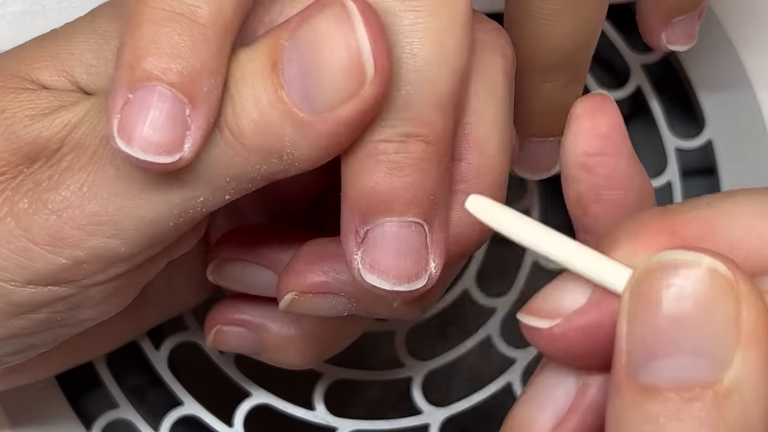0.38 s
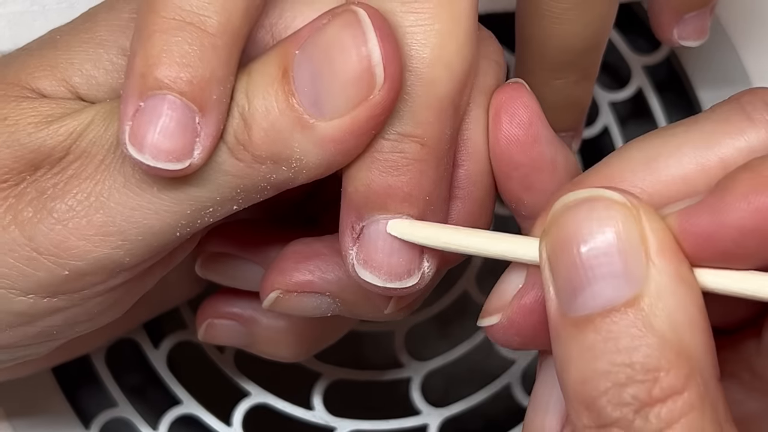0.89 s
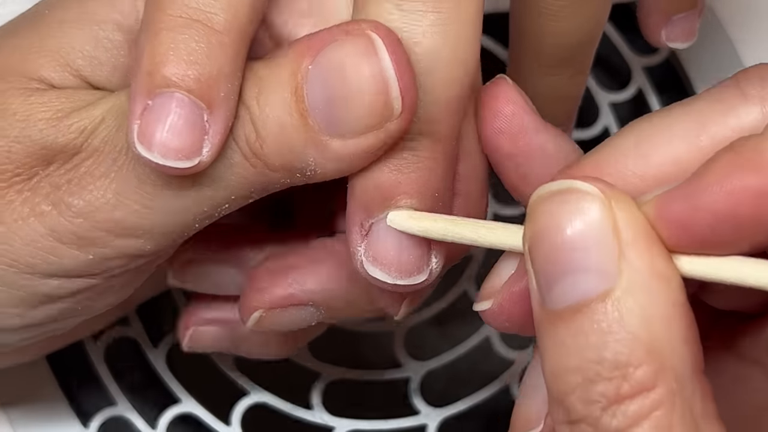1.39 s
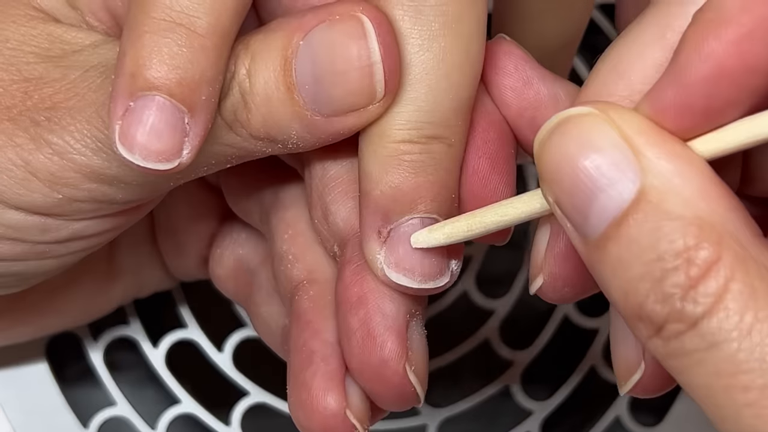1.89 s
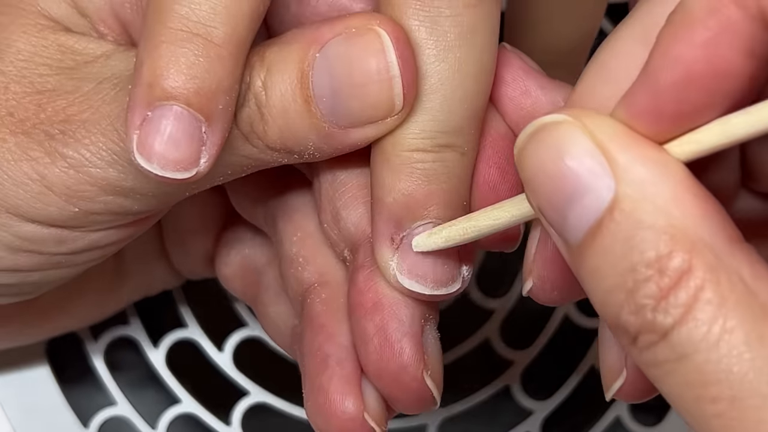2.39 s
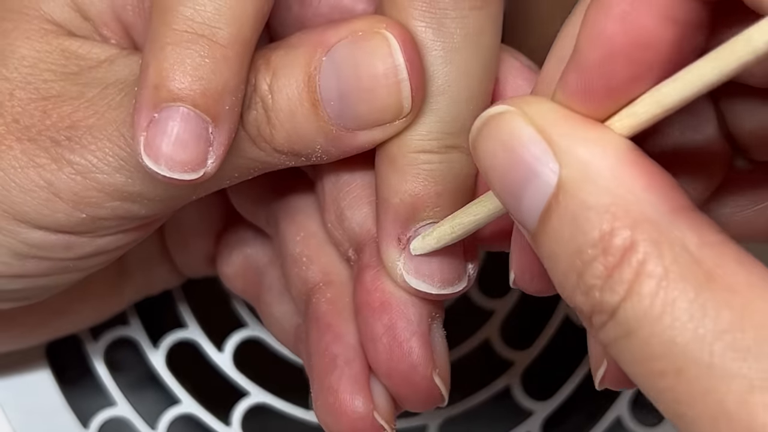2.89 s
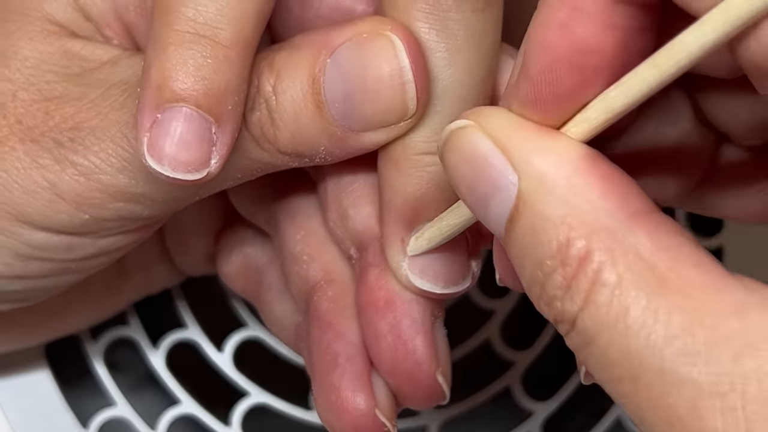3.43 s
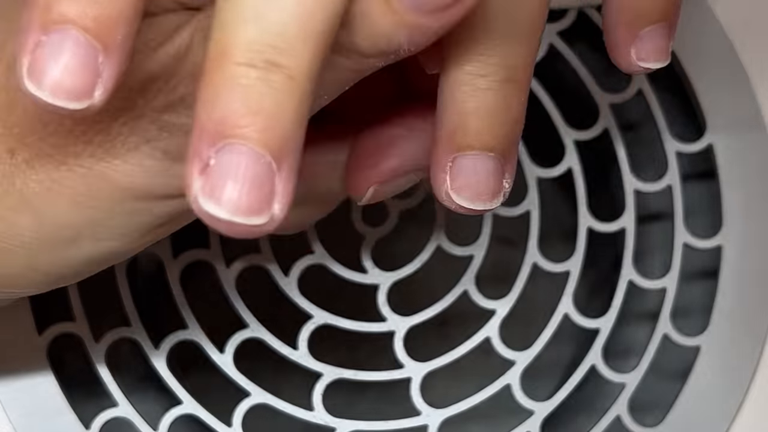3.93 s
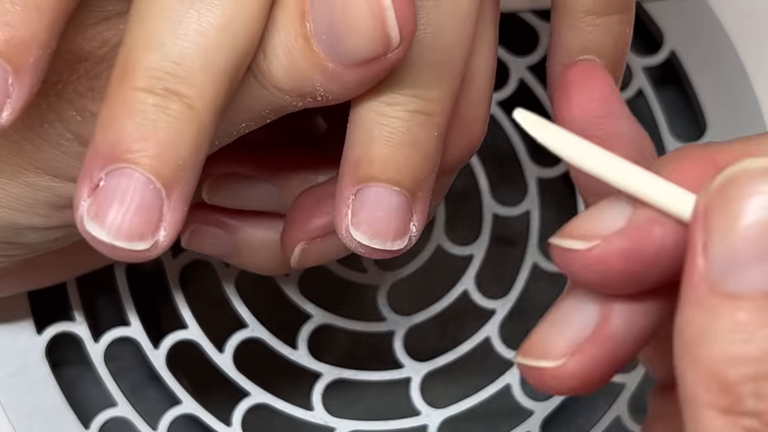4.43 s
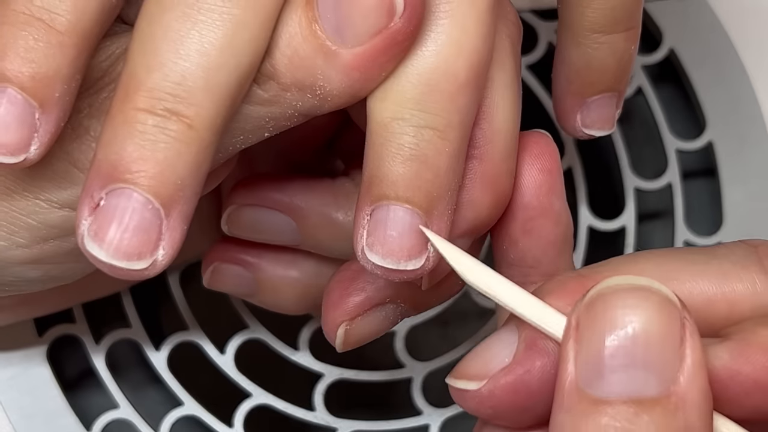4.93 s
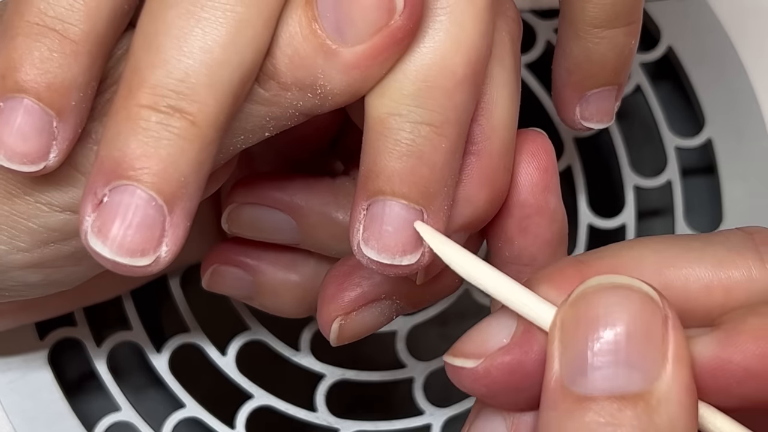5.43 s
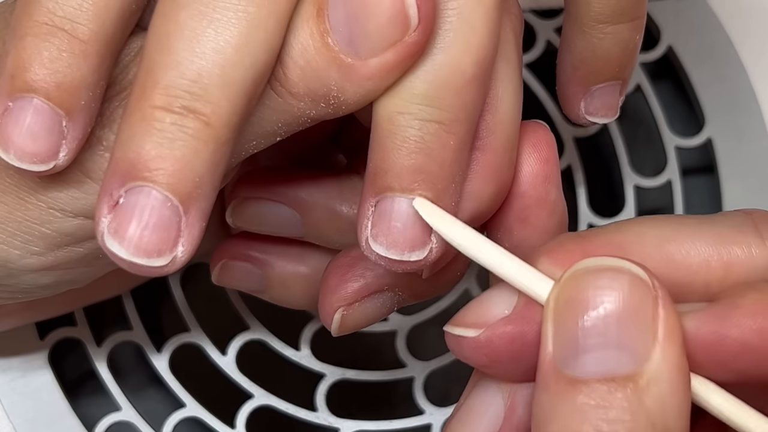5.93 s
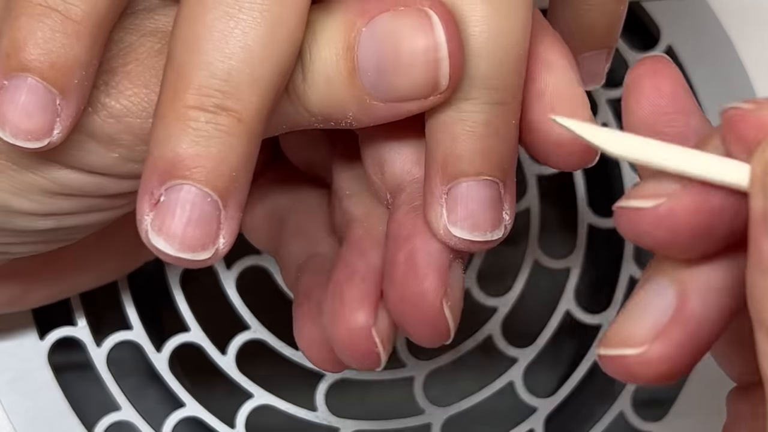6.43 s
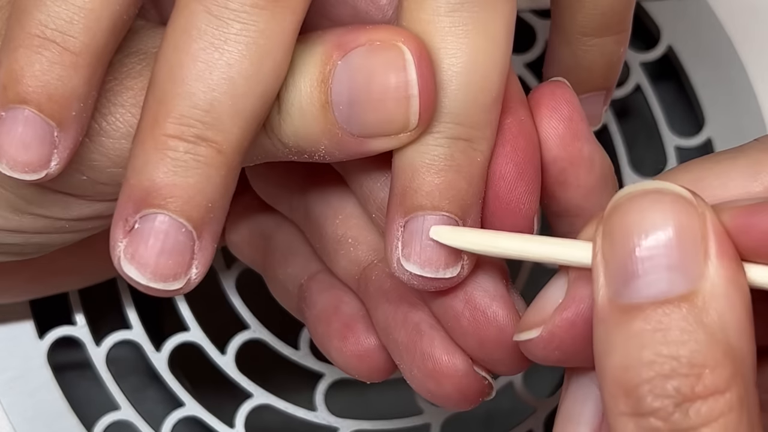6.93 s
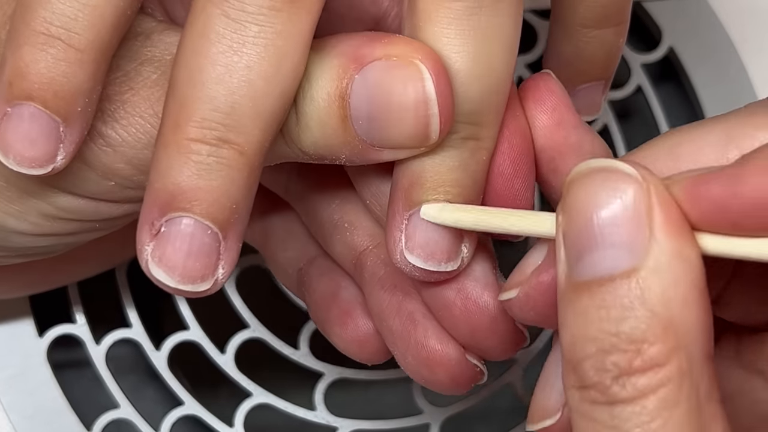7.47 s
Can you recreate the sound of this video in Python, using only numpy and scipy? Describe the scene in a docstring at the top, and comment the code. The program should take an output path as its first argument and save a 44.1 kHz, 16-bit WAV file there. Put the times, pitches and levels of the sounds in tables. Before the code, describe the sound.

From 0 to about 7.6 seconds a small extraction fan under a grille runs without stopping, recorded close by a phone in a quiet room. Its very low hum wavers in pitch and strength, surrounded by a low booming rumble and dark, soft rushing air with slight hollow housing resonances; extremely faint thin tones flicker in the high treble. Handling sounds are tiny and mostly buried. Around 0.3-0.4 a small cluster of dry ticks from a wooden stick and nails; at 1.4-1.7 a tick, soft skin rubs and a brief slide. From 3.45 to 4.2 come the fullest grainy rubs and narrow hisses sinking in pitch as the hands shift, with fading rubs to 4.5. A very short crisp tick falls at 4.8, slight rubs at 5.2-5.8, a faint tick at 6.2, then short dry scrapes and slides at 6.3-6.6. The fan alone continues to the end.

```python
"""A low, wavering hum under rushing air: a small extraction fan below a grille on a table, close to
a phone in a quiet room. Hum, rumble and air are noise shaped by resonances; thin tones flicker on top.
Hands shifting above the grille give faint rubs (grainy noise), slides (narrow sinking noise bands)
and ticks (decaying sines) in the treble."""
import sys
import numpy as np
from scipy import signal
from scipy.fft import rfft, irfft, next_fast_len
from scipy.io import wavfile
from scipy.ndimage import uniform_filter1d

SR = 44100
rng = np.random.default_rng(int(sys.argv[2]) if len(sys.argv) > 2 else 0)


def boost_factor(decibels):
    """Convert a level in decibels to a linear amplitude factor."""
    exponent = np.asarray(decibels, float) / 20
    return 10 ** exponent


def wav_record(signal):
    """Record a signal, one row per channel, as 16-bit PCM in the file named by sys.argv[1]."""
    frames = np.transpose(np.atleast_2d(signal))
    bounded = np.clip(frames, -1, 1)
    # unit amplitude maps onto the largest positive 16-bit level
    quanta = np.round(bounded * 32767).astype(np.int16)
    wavfile.write(sys.argv[1], SR, quanta)


N = 334273
TIME = np.arange(N) / SR
HZ = np.maximum(np.fft.rfftfreq(N, 1 / SR), 1)


def level(x, db):
    """Scale so that the mean of both ports has this rms level."""
    mid = np.mean(x, axis=0)
    return x * boost_factor(db) / np.sqrt(np.mean(mid ** 2))


def over_hz(points, column=1):
    """A table column interpolated over log frequency."""
    table = np.array(points, float)
    return np.interp(np.log(HZ), np.log(table[:, 0]), table[:, column])


def over_time(points):
    """Gain from a (t/s, level/dB) table, interpolated in dB."""
    return boost_factor(np.interp(TIME, *np.transpose(points)))


def lifts(modes):
    """Gain of resonances that rise over a flat floor."""
    power = 1
    for hz, width_hz, db in modes:
        detune = 2 * (HZ - hz) / width_hz
        power = power + (boost_factor(db) ** 2 - 1) / (1 + detune ** 2) ** 2
    return np.sqrt(np.maximum(power, .01))


def walk(rate_hz):
    """Random levels held 1 / rate_hz and slewed twice; spread near 1."""
    hold = int(SR / rate_hz)
    steps = np.repeat(rng.standard_normal(N // hold + 1), hold)
    return 1.3 * uniform_filter1d(uniform_filter1d(steps, hold), hold)[:N]


# stereo pickup at the two ports: f/Hz, own over shared part/dB, left over right/dB, left lead/rad
PORTS = [(60, -43.5, 0, -0.02), (138, -32, 0.5, -0.055), (328, -22.5, 2, -0.19), (560, -4.5, 2, -0.76),
         (950, 4.5, 2, -0.46), (1200, -8.5, 0, -0.86), (1760, -11.5, 1, 0.095), (2940, -2.5, -0.5, -1),
         (3700, -7.5, 0.2, -1.1), (4540, -4, 0, -1.4), (5150, -3.5, -0.2, -2), (5830, -4, 0, -1.1),
         (9150, -5, 0.5, -1.1), (15000, -7, 0, -1.9)]


def ports(gain):
    """Coloured noise at both ports: a shared part plus an independent part each."""
    shared, left, right = rfft(rng.standard_normal((3, N)))
    shared_power = 1 / (1 + boost_factor(over_hz(PORTS, 1)) ** 2)
    own = np.sqrt(1 - shared_power) * np.array([left, right])
    both = np.sqrt(shared_power) * shared + own
    lean = boost_factor(over_hz(PORTS, 2) / 2) * np.exp(.5j * over_hz(PORTS, 3))
    return irfft(gain * both * np.array([lean, 1 / lean]), N)


def narrow(hz, width_hz):
    """Narrow noise band on a moving centre, 1.4 rad apart at the two ports."""
    phase = 2 * np.pi * np.cumsum(hz + 0 * TIME) / SR + np.array([[0], [1.4]])
    return walk(width_hz) * np.sin(phase) + walk(width_hz) * np.cos(phase)


def stroke(start_s, length_s, rise, release_s, fade_db):
    """Envelope: rise over a share of the stroke, fade while contact lasts, release."""
    age = (TIME - start_s) / length_s
    edges = np.clip(np.minimum(age / rise, (1 - age) * length_s / release_s + 1), 0, 1)
    return edges * boost_factor(fade_db * np.clip((age - rise) / (1 - rise), 0, 2))


# thin flickering treble tones: f/Hz, width/Hz, level/dB before the common swell
WHINES = [(9451, 25, -103), (9515, 25, -103), (9665, 25, -104), (9731, 25, -104), (15440, 20, -101),
          (15507, 20, -96), (15619, 20, -97), (15707, 20, -95), (15500, 500, -95)]


def whines():
    """Thin wavering lines: narrow noise bands under one slow common swell."""
    swell = boost_factor(2.7 * walk(5.2))
    return swell * sum(boost_factor(db) * narrow(hz, width_hz) for hz, width_hz, db in WHINES)


# wooden stick and nails: t/s, click level/dB, f/Hz, decay/s
TICKS = [(0.2888, -55, 13700, .0004), (0.347, -66, 12000, .00015), (0.3735, -61, 13600, .0003),
         (0.3945, -59, 3900, .0018), (1.3968, -59, 11000, .00012), (3.5244, -59, 9500, .00015),
         (3.7744, -65, 11000, .00015), (4.2822, -66, 11000, .00015), (4.8057, -51, 9000, .00008),
         (5.9367, -70, 8200, .0002), (6.0494, -70, 12000, .0002), (6.1913, -57, 13000, .0002)]


def ticks():
    """Dry click of a few cycles, duller knock of the wood, short noisy tail."""
    out, t = np.zeros(N), np.arange(400) / SR
    noises = rng.standard_normal((len(TICKS), 400))
    knock = .35 * np.exp(-t / .0004) * np.sin(2 * np.pi * 5600 * t)
    for (start_s, db, hz, decay_s), noise in zip(TICKS, noises):
        click = np.exp(-t / decay_s) * np.sin(2 * np.pi * hz * t)
        tail = .3 * np.exp(-t / .0008) * np.diff(noise, prepend=0)
        i = int(start_s * SR)
        out[i:i + 400] += boost_factor(db) * (click + knock + tail)
    # hands nearer the right port: one-sample lead
    return np.array([np.roll(out, 1), out])


# arm over the rest, narrow hiss bands: t/s, length/s, start f/Hz, level/dB before fade
SLIDES = [(1.41, .11, 5750, -83), (1.55, .07, 5750, -76), (3.655, .58, 5560, -74), (3.7, .12, 7000, -77),
          (3.84, .36, 6900, -73), (6.37, .06, 8050, -76), (6.42, .17, 5350, -75), (6.495, .05, 7750, -77)]
SLIDE_RISE, SLIDE_RELEASE_S, SLIDE_FADE_DB = .2, .05, -6  # rise as a share of the stroke
SLIDE_SAG_PER_S, SLIDE_WANDER, SLIDE_WIDTH = .1, .005, .085  # shares of the start pitch
SLIDE_PATCHY_DB = 1.7  # broken contact


def slides():
    """Narrow, broken bands of noise that sink as the arm slows."""
    out = 0
    for start_s, length_s, hz, db in SLIDES:
        sag = SLIDE_SAG_PER_S * np.clip(TIME - start_s, 0, length_s)
        sinking_hz = hz * (1 - sag + SLIDE_WANDER * walk(17))
        gate = stroke(start_s, length_s, SLIDE_RISE, SLIDE_RELEASE_S, SLIDE_FADE_DB)
        contact = boost_factor(db + SLIDE_PATCHY_DB * walk(40))
        out = out + gate * contact * narrow(sinking_hz, SLIDE_WIDTH * hz)
    return out


# skin on skin, a row a stroke: t/s, length/s, then soft rub, dry scrape, fine crackle level/dB before fade
RUBS = [(0.082, .05, -90, -92, -91.5), (0.318, 0.082, -82, -83, -87.5), (1.384, .13, -76, -82, -83),
        (1.502, .22, -82, -97, -97.5), (3.444, .04, -86, -82, -89.5), (3.513, .16, -68.5, -72, -80),
        (3.663, .12, -73, -80, -82), (3.758, .42, -71.5, -84, -79.5), (3.9, 0.13, -79, -84, -81),
        (4.128, .14, -83, -89, -89), (4.28, .27, -84, -89, -86), (5.238, 0.036, -80, -91, -93.5),
        (5.42, 0.034, -81, -90, -92.5), (5.537, .05, -70, -89, -90), (5.569, .2, -74, -96, -91),
        (6.304, .02, -79, -73, -80.5), (6.31, .3, -73, -85, -88), (6.361, .065, -83, -87, -72.5),
        (6.492, .045, -75, -76.5, -70.5), ]
# spectra of rub, scrape, crackle: f/Hz, relative density/dB
RUB_COLOURS = [
    [(900, -8), (1400, -2), (2500, -6), (4300, 0), (6000, -5), (8000, -25), (16000, -50)],
    [(4000, -30), (6500, -8), (8500, 0), (11000, -6), (13000, -25), (16000, -40)],
    [(9000, -35), (12000, -10), (14000, -2), (15700, 0)],
]
RUB_RISE, RUB_RELEASE_S, RUB_FADE_DB = 0.23, .04, -6  # rise as a share of the stroke
RUB_GRAIN_DB, RUB_GRAIN_HZ = 2.1, 370


def rubs():
    """Grainy friction hiss in three colours, each with its own grain."""
    hisses = []
    for colour in RUB_COLOURS:
        above_lowest = HZ > colour[0][0]
        hiss = level(ports(boost_factor(over_hz(colour)) * above_lowest), 0)
        hisses.append(hiss * boost_factor(RUB_GRAIN_DB * walk(RUB_GRAIN_HZ)))
    gains = 0
    for start_s, length_s, *dbs in RUBS:
        gate = stroke(start_s, length_s, RUB_RISE, RUB_RELEASE_S, RUB_FADE_DB)
        gains = gains + np.outer(boost_factor(dbs), gate)
    return sum(gain * hiss for gain, hiss in zip(gains, hisses))


# rushing air spectrum: f/Hz, relative density/dB
AIR = [(25, -34), (45, -13), (70, -0.5), (100, -13), (200, -9), (300, -16), (380, -29), (620, -31),
       (1050, -35), (1600, -44), (3000, -51), (5000, -64.5), (9000, -74), (12000, -80), (14000, -89.5)]
# housing and grille resonances: f/Hz, width/Hz, lift/dB
HOUSING = [(213, 12, 3.5), (251.4, 41, 4), (287.5, 22, 6), (357.6, 22, 5.5), (498.3, 102, 8), (684, 60, 2),
           (789.3, 16, 11.5), (891, 43, 5), (930, 44, 5.5), (1207.6, 140, 11.5), (1429, 167, 11),
           (2050, 83, 4.5), (2233, 110, 8.5), (2516, 100, 6), (4220, 730, 3), (4700, 400, 3),
           (7660, 560, 4.5)]
AIR_DB = -35.5


def air():
    """Steady rush through blades and grille rings the housing; the treble flickers a little."""
    colour = boost_factor(over_hz(AIR)) * lifts(HOUSING)
    high = 1 / (1 + (5000 / HZ) ** 4)  # power share of the treble
    steady = ports(colour * np.sqrt(1 - high))
    flickering = ports(colour * np.sqrt(high)) * boost_factor(1.3 * walk(12))
    return level(steady + flickering, AIR_DB)


# air resonances in the case: f/Hz, width/Hz, lift/dB
CASE = [(128.1, 21, 27.5), (147.05, 22, 29.5), (162.5, 17, 19.5), (180.7, 27, 24)]
# rumble swell: t/s, level/dB
RUMBLE = [(0.0, -37), (0.12, -35), (3.17, -34.5), (3.42, -38.5), (3.52, -30.5), (3.63, -36), (5.19, -32.5),
          (5.83, -38), (6.4, -31.5), (6.42, -40), (6.56, -29.5), (6.95, -37), (7.56, -30), (7.58, -38)]


def rumble():
    """Turbulence booming in the case: noise through its resonances, swelling and sinking."""
    boom = level(ports(lifts(CASE) - 1), 0)
    return boom * over_time(RUMBLE)


# hum swell: t/s, level/dB
HUM_SWELL = [(0, -40), (.3, -47.5), (.44, -32), (.8, -40), (1.32, -32.5), (1.6, -38.5), (2.1, -35.5),
             (2.5, -43), (2.83, -32), (3.1, -41.5), (3.5, -30), (4.0, -35), (4.45, -35.5), (5.1, -39.5),
             (5.5, -34), (5.92, -39), (6.13, -29), (6.55, -46.5), (7.1, -34.5), (7.58, -40)]
HUM_HZ, HUM_WIDTH_HZ = 74.55, 7.6
HUM_FLOOR_POWER = 0.2  # higher keeps more of the ring's own level wavering


def hum():
    """Turbulence rings one narrow low resonance, so the pitch wavers; the level follows the swell."""
    resonance = 1 / (1 + (2 * (HZ - HUM_HZ) / HUM_WIDTH_HZ) ** 2)
    ring = signal.hilbert(level(ports(resonance), 0), next_fast_len(N))[:, :N]
    evened = ring.real / np.sqrt(np.abs(ring) ** 2 / 2 + HUM_FLOOR_POWER)
    return evened * over_time(HUM_SWELL)


def scene():
    """Fan below, hands above."""
    hands = ticks() + slides() + rubs()
    fan = air() + rumble() + hum()
    return whines() + hands + fan


def band_limit(x):
    """A steep low-pass at the top of the band."""
    return signal.sosfilt(signal.butter(12, 15750, fs=SR, output="sos"), x)


def record(dry):
    """The sound eases in and out over 4 ms."""
    ease = np.clip(np.minimum(TIME, TIME[-1] - TIME) / .004, 0, 1)
    mix = dry * np.sin(np.pi / 2 * ease) ** 2
    return band_limit(mix)


dry = scene()
out = record(dry)
wav_record(out)
```